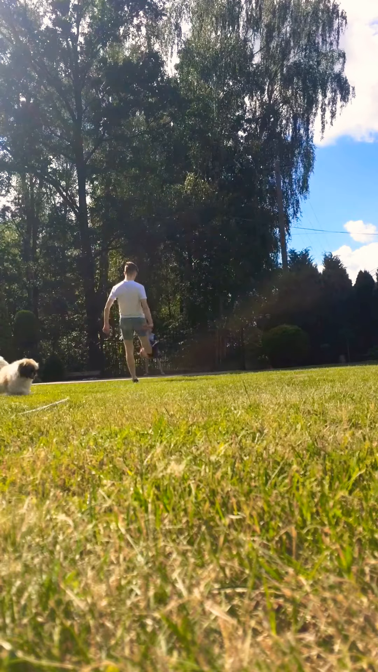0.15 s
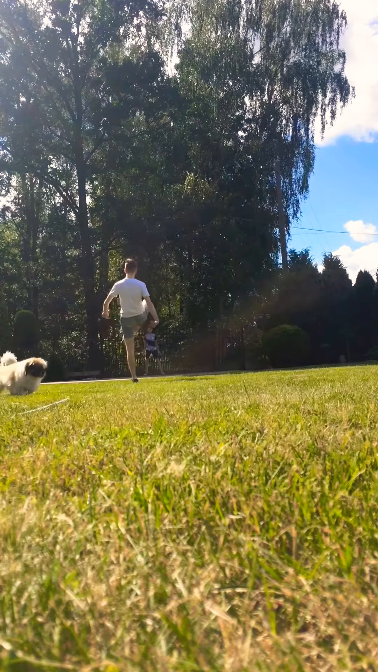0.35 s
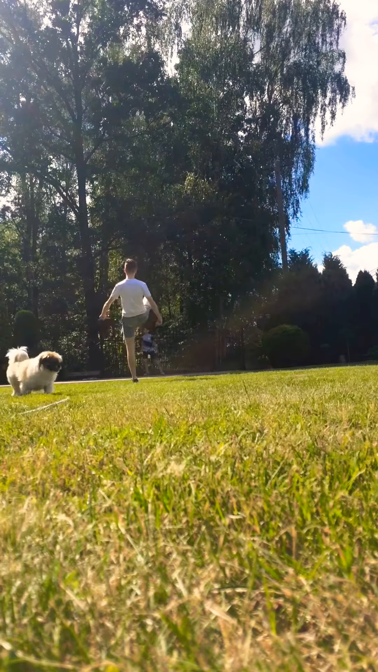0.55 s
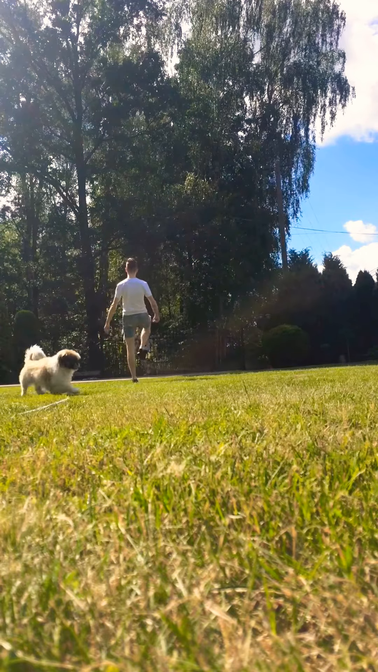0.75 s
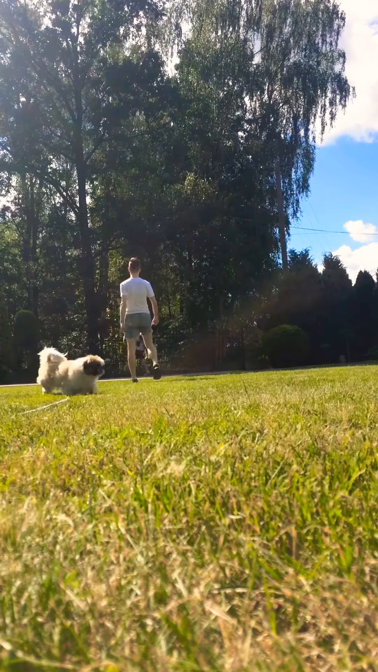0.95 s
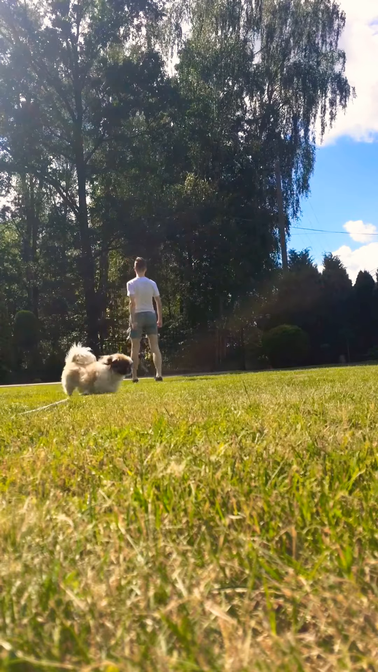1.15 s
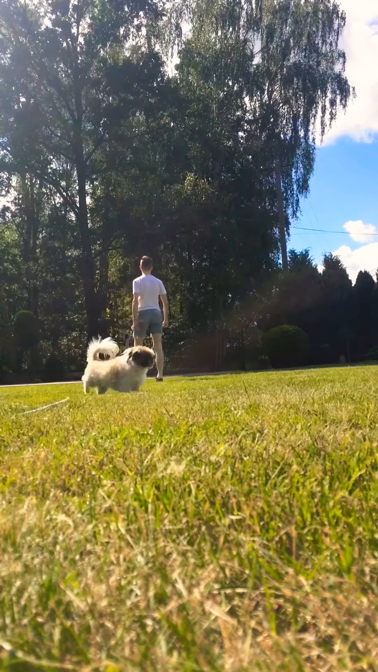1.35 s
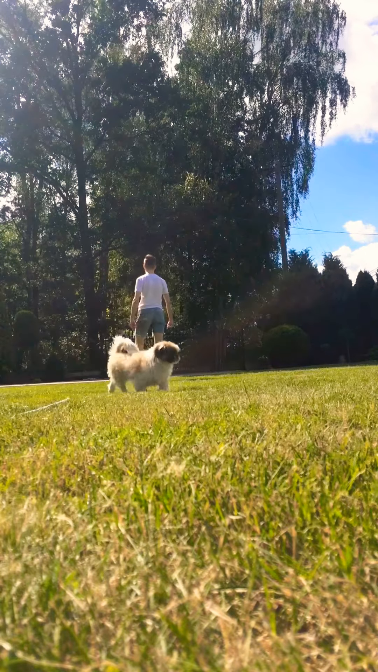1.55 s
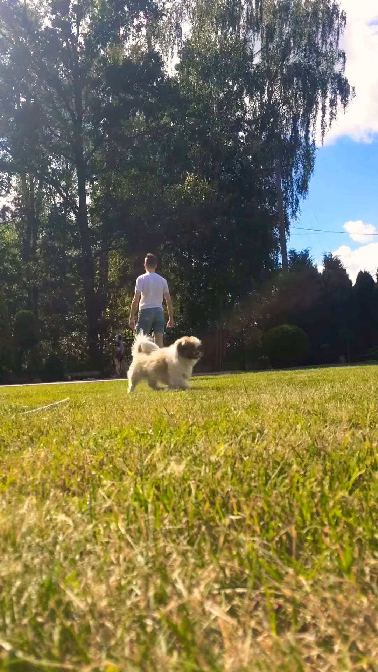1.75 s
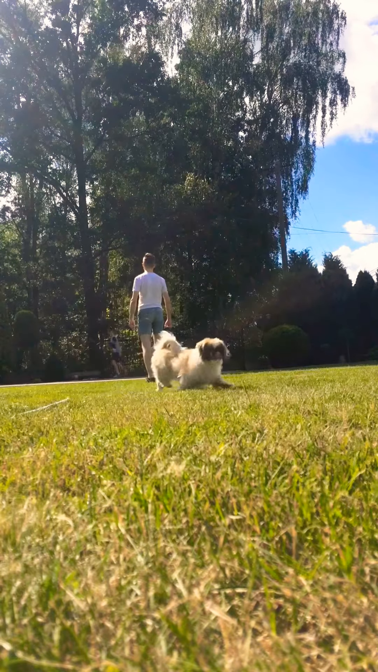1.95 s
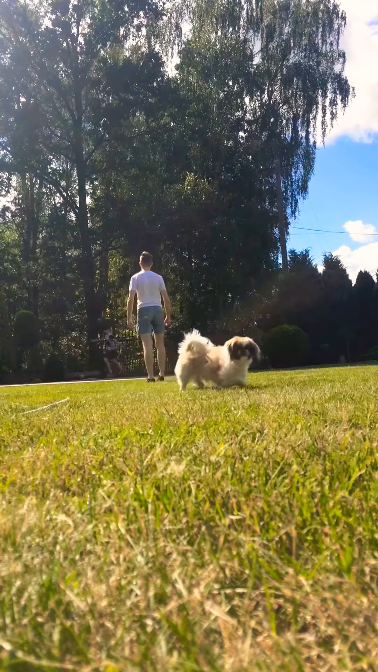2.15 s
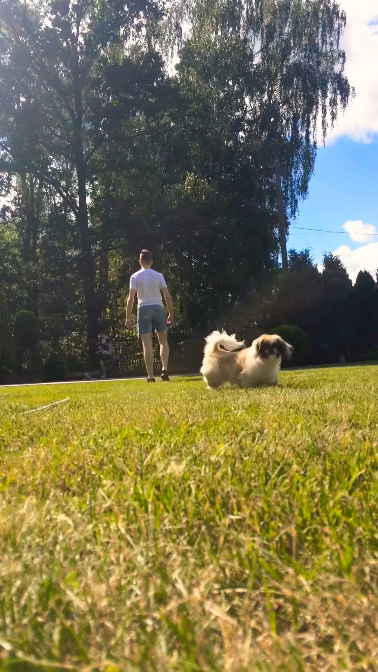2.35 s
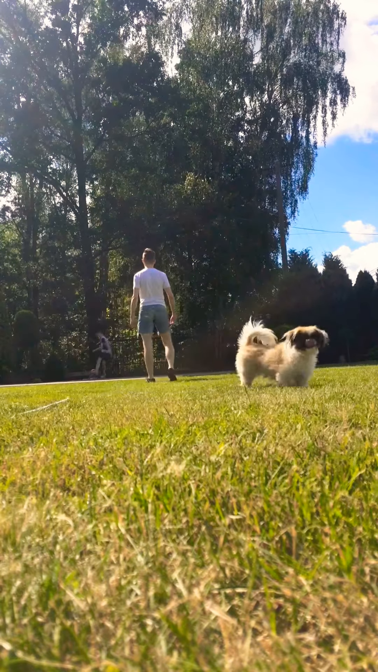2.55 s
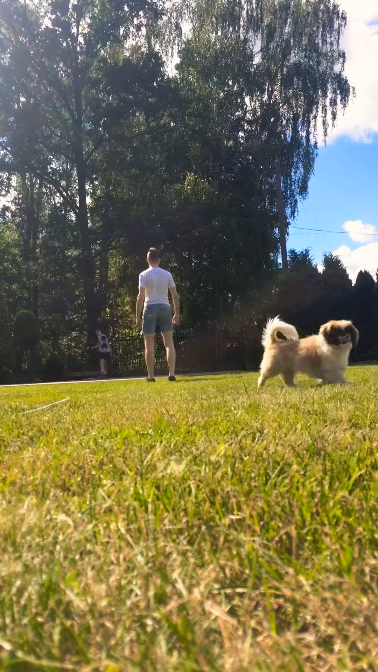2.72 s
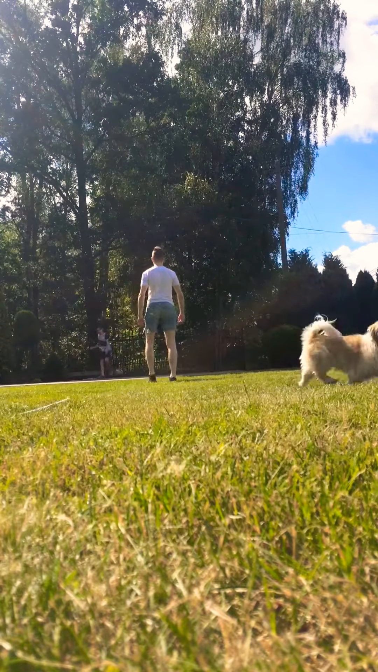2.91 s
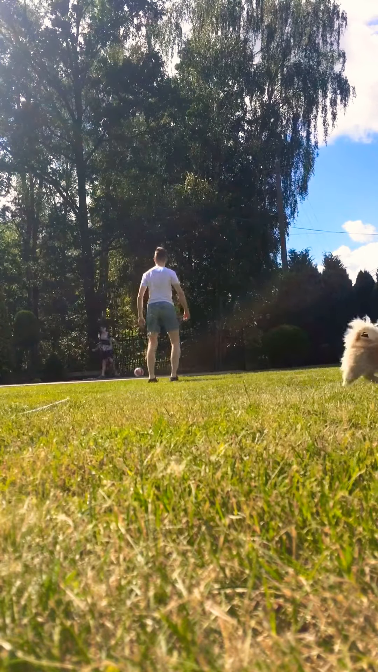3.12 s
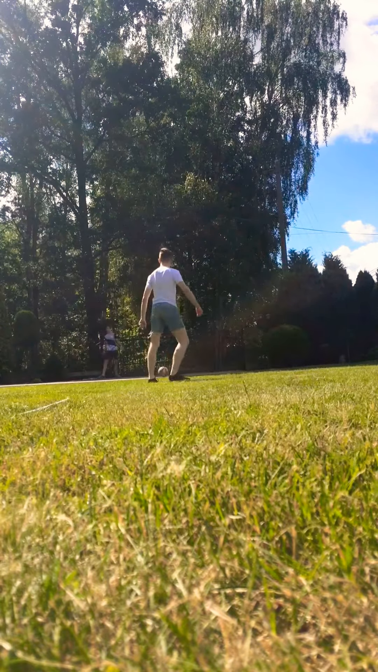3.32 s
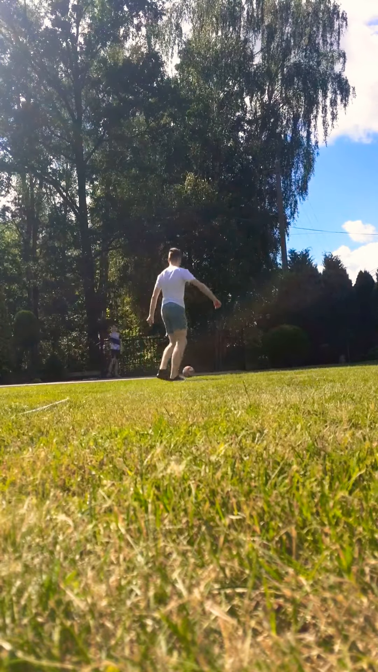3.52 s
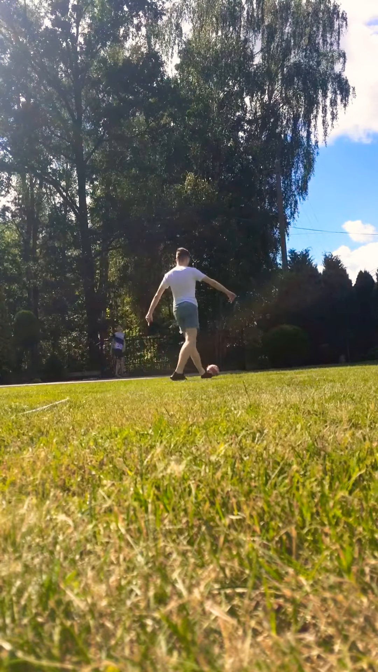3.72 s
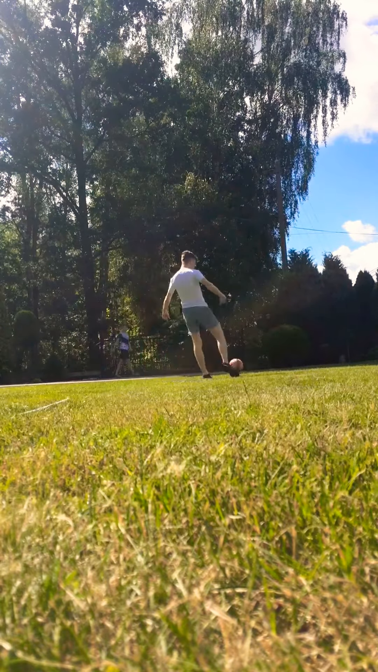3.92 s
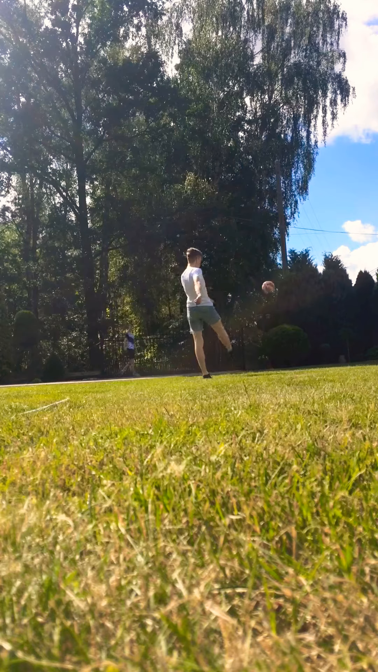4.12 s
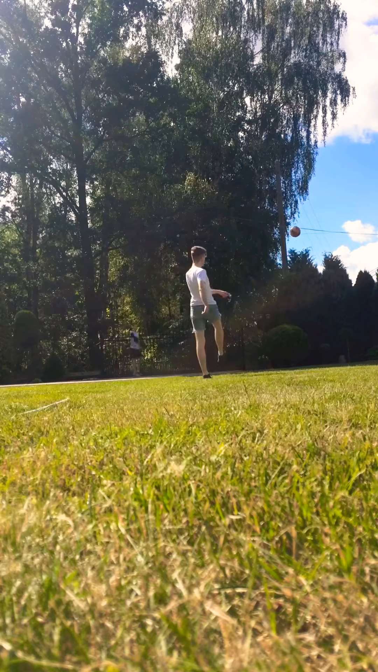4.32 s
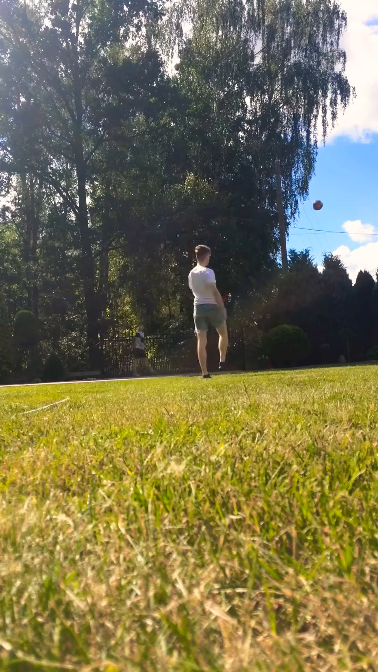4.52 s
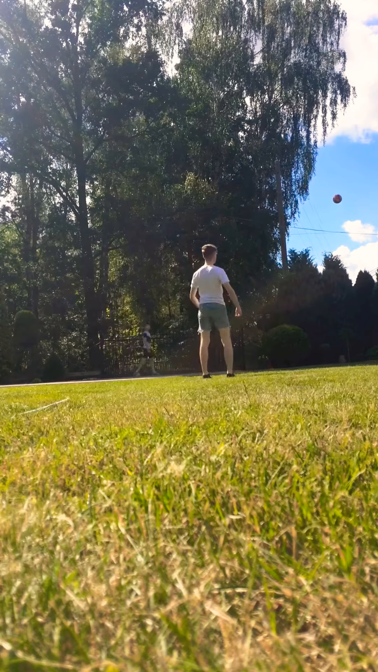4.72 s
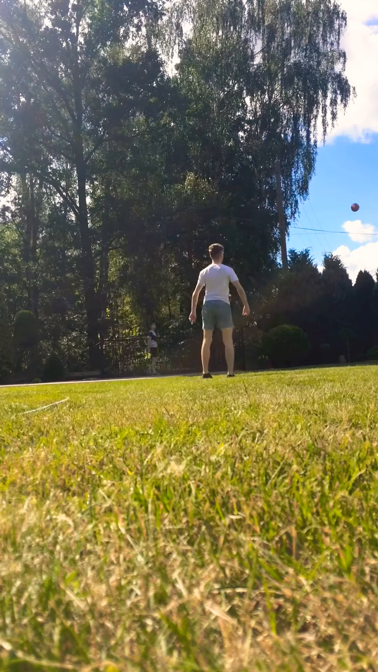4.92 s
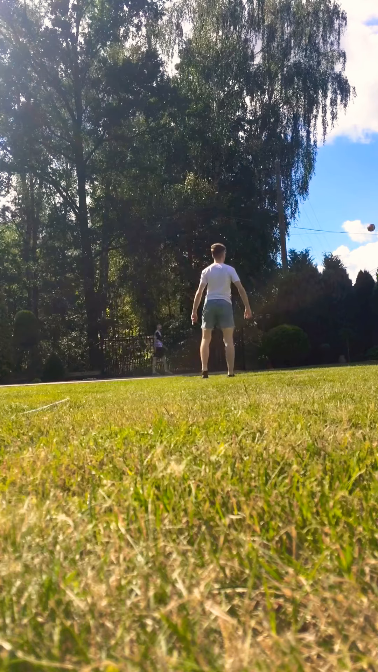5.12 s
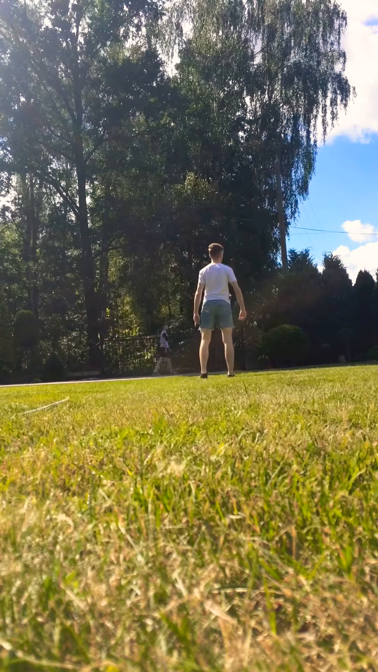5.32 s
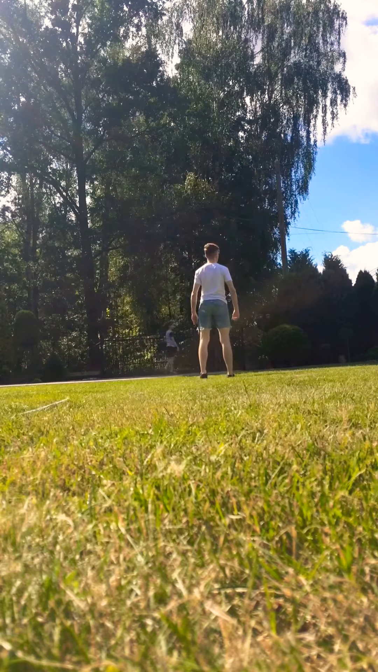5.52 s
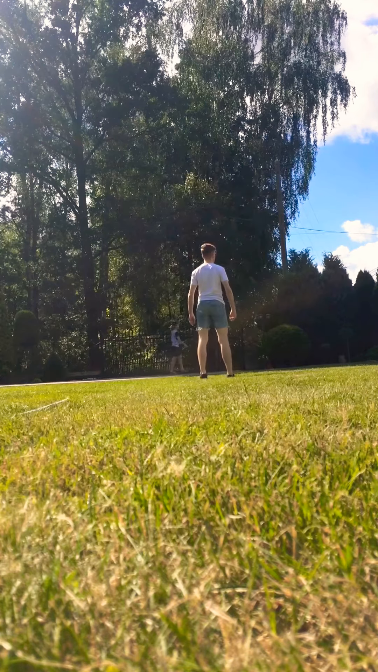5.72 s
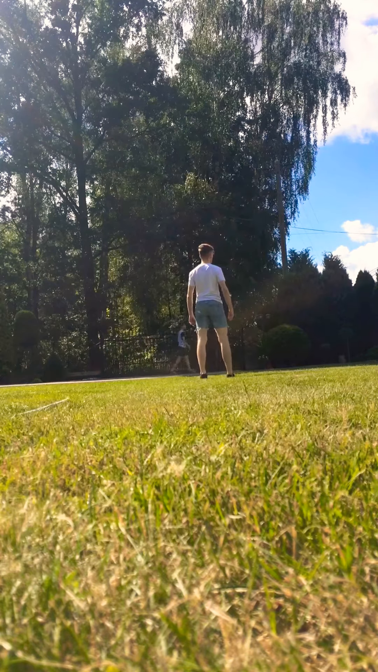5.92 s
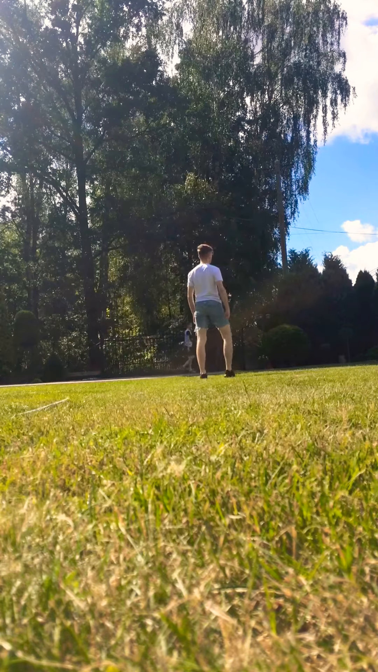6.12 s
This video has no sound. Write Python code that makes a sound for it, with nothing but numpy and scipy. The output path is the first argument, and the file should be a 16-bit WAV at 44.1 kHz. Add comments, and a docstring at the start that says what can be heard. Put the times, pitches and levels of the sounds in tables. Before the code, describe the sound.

Faint rustling leaves, distant traffic and a wavering motor hum form a quiet outdoor background, heard from down in the grass. A little way off, a football gives five deep, hollow thumps, one to two seconds apart, the first and fourth the strongest. A nearby wall and trees add a short dull tail. Soft taps on the turf, low thuds and small ticks fall between the kicks.

```python
"""On a lawn near a wall, microphone lying in the grass, a football kicked about some way off.
Leaves hiss in the breeze, far traffic rumbles and a motor hums throughout. Each contact of the ball
is a low push of air, then a knock of the shell and a crack, on touch and again on letting go;
the wall sends it back, trees and hedges scatter it. Some kicks trail after-thumps or a dull tail.
Soft taps, low thuds, ticks and grass swishes lie between."""
import sys
import numpy as np
from scipy import signal
from scipy.io import wavfile

SR = 44100
rng = np.random.default_rng(int(sys.argv[2]) if len(sys.argv) > 2 else 0)


def generate_wav(sig):
    """Save sig (samples, or channels by samples) to the path in sys.argv[1] as 16-bit PCM at SR."""
    pcm = np.round(np.clip(np.atleast_2d(sig).T, -1, 1) * 32767).astype(np.int16)
    wavfile.write(sys.argv[1], SR, pcm)


N = 271523

# breeze in the leaves: t/s, level under 8 kHz/dB, treble relative to that level/dB
BREEZE_LEVELS = [(0, -61, -2), (.45, -62, -2.5), (.8, -60, -2.5), (1.15, -60, -1.5), (1.75, -59.5, -2.3),
                 (2.1, -62, -2.3), (2.45, -61.5, -0.5), (2.85, -61.5, -1.5), (3.2, -60, -1),
                 (3.7, -62.5, -2), (5.05, -63.5, -0.5), (5.55, -67.5, -5.5), (5.85, -65, -4),
                 (6.16, -66, -4)]
# spectrum of the leaves: f/Hz, relative level/dB
LEAF_SPECTRUM = [(290, -35), (500, -5), (522, -5.5), (1150, -12), (1270, -14), (1470, -5), (3110, 1),
                 (6030, -0.5), (7930, -4.5), (12900, 5), (15600, -29)]
# softer, darker hiss around 2 kHz: t/s, level/dB
DARK_HISS_LEVELS = [(0, -72), (1.6, -73), (3.5, -71), (4.3, -71.5), (5.2, -70), (6.16, -70)]
# spectrum of the far traffic: f/Hz, relative level/dB
TRAFFIC_SPECTRUM = [(20, -51), (40, -2.5), (65, 1.5), (100, -6), (160, -7.5), (250, -15), (400, -19.5),
                    (650, -30.5), (1000, -31)]
# traffic under about 125 Hz: t/s, level/dB
TRAFFIC_DEEP_LEVELS = [(0, -56.5), (1.35, -57), (1.65, -65.5), (2.1, -60.5), (2.7, -56.5), (3.05, -54.5),
                       (3.45, -58.5), (4.1, -59), (6.16, -59.5)]
# traffic above that: t/s, level/dB
TRAFFIC_UPPER_LEVELS = [(0, -59.5), (.6, -63), (2.4, -62), (2.9, -60), (4, -58.5), (4.6, -61.5),
                        (5.7, -63.5), (6.16, -61.5)]
# motor hum: t/s, level/dB
HUM_LEVELS = [(0, -56), (1, -57), (1.5, -68), (2, -62.5), (2.4, -55), (3.05, -55), (3.45, -67.5),
              (4, -61.5), (5.2, -59), (5.75, -61.5), (6.16, -81)]
# the motor's faint tones: f/Hz, level/dB
MOTOR_TONES = [(206, -75.5), (292, -78), (351, -81)]
# kicks and bounces: t/s, push level/dB, push f/Hz, push cycles, touch gain/dB, touch tilt/(dB/octave),
# ring/multiple of t60, knock low-pass f/Hz, crack level/dB, contact length/s, let-go gain/dB,
# let-go tilt/(dB/octave)
CONTACTS = [(0.178, -12.5, 72.3, 1.28, -20.5, 8, .75, 2200, -56, .0175, -26, 0.5),
            (1.2448, -26.5, 136, 1.1, -33, 5, .8, 1200, -51.5, .0214, -38.5, 5),
            (2.598, -19.5, 71, 1.4, -30.5, 3.5, 1.0, 1800, -58, .021, -33.5, 2),
            (4.065, -15.5, 75.5, 2, -14, 2, .7, 1040, -51.5, .0204, -28.5, -5.5),
            (5.9365, -26, 80.6, 1.68, -24.5, 6, .9, 810, -58, 0.01595, -24, 9.5)]
# modes of the ball's shell: f/Hz, relative level/dB, t60/s
SHELL_MODES = [(169.6, 16.5, 0.024), (245, 1, 0.041), (333, 6, 0.032), (427, 4.5, 0.018),
               (592, -2.5, 0.013), (808, -24.5, 0.023), (1390, -4.5, 0.0036)]
# contact by contact: let-go ring/multiple of the touch's ring
LET_GO_RINGS = [1.55, 1.1, 0.92, 0.58, 0.85]
# each contact's echo off the wall: lag/s, push loss/dB, push cycles, knock loss/dB
WALL_ECHOES = [(.050, 9.5, 2.55, 14.5), (.0335, 7.5, 1.3, 5), (0.031, 11, 1.4, 13), (.0545, -2, 1.75, 18.5),
               (.0515, 12, 0.97, 11)]
# soft taps on turf: t/s, level/dB, centre f/Hz, length/s
TURF_TAPS = [(1.219, -48.5, 344, .034), (2.149, -66, 600, 0.015), (2.811, -59, 428, .012),
             (2.911, -53, 410, 0.029), (3.125, -54, 402, 0.037), (3.167, -61.5, 480, 0.036),
             (3.313, -54.5, 400, 0.047), (3.525, -64, 423, 0.069), (3.78, -59, 370, 0.025),
             (5.903, -57, 357, .022), (5.924, -54, 280, .012)]
# low thuds, on their own or late echoes and after-thumps of kicks: t/s, level/dB, f/Hz, cycles
LOW_THUDS = [(1.233, -29.5, 67.6, 2), (2.01, -43.5, 214, 3.6), (2.104, -42, 62.6, 1.9),
             (3.692, -40.5, 66.5, 1.14), (4.1564, -24.5, 106, 0.81), (4.194, -39.5, 90, 3.5),
             (5.737, -40.5, 71, 1.8), (5.804, -41, 78.6, 2), (5.964, -34, 105, 2)]
# high grass swishes, sharp ticks, dull low tails after kicks: t/s, level/dB, low f/Hz, high f/Hz, t60/s
NOISE_BURSTS = [(1.245, -52, 302, 785, 0.13), (1.244, -49, 2200, 13800, 0.28),
                (1.2466, -47, 700, 7000, 0.011), (2.945, -50, 1590, 4800, 0.13),
                (4.12, -40.5, 2750, 3600, 0.018), (5.079, -57, 6000, 14000, .03),
                (5.895, -56.5, 5400, 14000, 0.22), (5.935, -52.5, 4970, 10000, 0.24),
                (5.96, -58, 300, 786, 0.58)]


def from_db(db):
    """Gain of a level in dB."""
    return 10 ** (np.asarray(db) / 20)


def rms_one(x):
    """Scaled to rms 1."""
    return x / np.sqrt(np.mean(x ** 2) + 1e-20)


def in_time(rows):
    """Columns of a curve, one value per sample."""
    times, *columns = np.transpose(rows)
    return [np.interp(np.arange(N) / SR, times, column) for column in columns]


def drift(rate_hz):
    """Slow random wander of rms 1."""
    pole = np.exp(-2 * np.pi * rate_hz * 40 / SR)   # one step every 40 samples
    slow = signal.lfilter([1], [1, -2 * pole, pole * pole], rng.standard_normal(N // 40 + 2002))[2000:]
    return np.interp(np.arange(N) / 40, np.arange(len(slow)), rms_one(slow))


def band(x, low_hz, high_hz):
    """Band-pass."""
    edges_hz = [low_hz, min(high_hz, .45 * SR)]
    return signal.sosfilt(signal.butter(2, edges_hz, "band", fs=SR, output="sos"), x)


def add(out, start_s, piece):
    """Mixes a piece in at a moment."""
    at = round(start_s * SR)
    out[at:at + len(piece)] += piece[:N - at]


def banded_noise(spectrum, below_db, above_db, split_hz, low_hz, count, flicker_db):
    """Flickering half-octave noise bands; those under and over the split follow their own levels."""
    parts, together = np.zeros((2, N)), drift(2.6)
    white = rng.standard_normal((2, N))
    edges = low_hz * 2 ** (np.arange(count + 1) / 2)
    hz, db = np.transpose(spectrum)
    for k, (low, high) in enumerate(zip(edges, edges[1:])):
        centre = np.sqrt(low * high)
        level_db = np.interp(np.log(centre), np.log(hz), db)
        level_db += flicker_db * (together + drift(6.4) + 0.3 * drift(0.27))
        parts[int(centre > split_hz)] += from_db(level_db) * band(white[k % 2], low, high)
    return from_db(below_db) * rms_one(parts[0]) + from_db(above_db) * rms_one(parts[1])


def leaves():
    """Leaves hiss, rising and falling with the breeze."""
    hiss_db, treble_db = in_time(BREEZE_LEVELS)
    return banded_noise(LEAF_SPECTRUM, hiss_db, hiss_db + treble_db,
                        split_hz=7000, low_hz=705.5, count=10, flicker_db=0.5)


def far_traffic():
    """Traffic in the distance: an uneven rumble, mostly bass."""
    deep_db, = in_time(TRAFFIC_DEEP_LEVELS)
    upper_db, = in_time(TRAFFIC_UPPER_LEVELS)
    return banded_noise(TRAFFIC_SPECTRUM, deep_db, upper_db,
                        split_hz=125, low_hz=21.5, count=11, flicker_db=2.1)


def dark_hiss():
    """A softer hiss beneath the leaves; its level flickers quickly."""
    white = rng.standard_normal((2, N))
    level_db = in_time(DARK_HISS_LEVELS)[0] + 0.94 * drift(23)
    return from_db(level_db) * rms_one(band(white[0], 1750, 2610) + 0.67 * band(white[1], 985, 1750))


def motor(hum_hz=125):
    """A motor hums: one wavering tone and a few faint, steadier ones."""
    hum_db, = in_time(HUM_LEVELS)
    out = from_db(hum_db + 2.4 * drift(9)) * np.sin(2 * np.pi * np.cumsum(hum_hz + 2.2 * drift(8)) / SR)
    for hz, db in MOTOR_TONES:
        out += from_db(db + 2.5 * drift(2.5)) * np.sin(2 * np.pi * np.cumsum(hz + 1.2 * drift(3)) / SR)
    return np.sqrt(2) * out


def knock(gain_db, tilt, ring, top_hz, crack_db, spread_db):
    """The ball's shell modes, set off inwards by a soft contact, and a short crack."""
    t = np.arange(SR // 8) / SR
    mode_hz, mode_db, mode_t60 = np.transpose(SHELL_MODES)[:, :, None]
    # a harder contact favours the upper modes; a foot or turf that stays in touch shortens the ring
    start_db = mode_db + spread_db + tilt * np.log2(mode_hz / 340)
    modes = from_db(start_db - 60 * t / (mode_t60 * ring)) * np.sin(2 * np.pi * mode_hz * t)
    onset = np.sin(np.pi / 2 * np.minimum(t / 0.003, 1)) ** 2
    shell = -from_db(gain_db) * modes.sum(axis=0) * onset
    shell = signal.sosfilt(signal.butter(4, top_hz, fs=SR, output="sos"), shell)
    crack = rms_one(band(rng.standard_normal(len(t)), 1000, 6000)) * from_db(-60 * t / 0.093)
    return shell + from_db(crack_db) * crack


def push(hz, cycles):
    """A few swings of air that swell and die as the ball squashes and springs back; no net flow."""
    samples = cycles / hz * SR
    progress = np.arange(round(samples)) / samples
    swell = np.sin(np.pi * progress ** .85) ** 1.2
    swing = np.sin(2 * np.pi * cycles * progress)
    return swell * (swing - np.sum(swell * swing) / np.sum(swell))


def football(squash_lag_s=.0025):
    """Touch, push and let-go of each contact, reaching the microphone straight and off the wall."""
    out = np.zeros(N)
    spreads_db = rng.normal(0, 1.2, (len(CONTACTS), 2, len(SHELL_MODES), 1))
    for contact, echo, let_go_ring, spread_db in zip(CONTACTS, WALL_ECHOES, LET_GO_RINGS, spreads_db):
        (start_s, push_db, hz, cycles, touch_db, touch_tilt,
         ring, top_hz, crack_db, contact_s, let_go_db, let_go_tilt) = contact
        lag_s, push_loss_db, echo_cycles, knock_loss_db = echo
        add(out, start_s + squash_lag_s, from_db(push_db) * push(hz, cycles))
        add(out, start_s + lag_s, from_db(push_db - push_loss_db) * push(hz, echo_cycles))
        straight = (start_s, 0, 0, crack_db)
        off_wall = (start_s + lag_s, knock_loss_db, 1, crack_db - 2)
        for arrival_s, loss_db, extra_tilt, path_crack_db in (straight, off_wall):
            touch = knock(touch_db - loss_db, touch_tilt + extra_tilt, ring,
                          top_hz, path_crack_db, spread_db[0])
            # letting go is softer: a lower top and a weaker crack
            let_go = knock(let_go_db - loss_db, let_go_tilt + extra_tilt, let_go_ring * ring,
                           0.69 * top_hz, path_crack_db - 10, spread_db[1])
            add(out, arrival_s, touch)
            add(out, arrival_s + contact_s, let_go)
    return out


def lawn_scatter(sound, gain_db=-33.5, t60_s=0.4, rise_s=.035):
    """Trees and hedges around the lawn scatter a sound into a dull, dying tail."""
    t = np.arange(SR // 2) / SR
    envelope = from_db(-60 * t / t60_s) * np.minimum(t / rise_s, 1) ** 2
    tail = band(rng.standard_normal(len(t)), 122, 540) * envelope
    return from_db(gain_db) * signal.fftconvolve(sound, tail / np.sqrt(np.sum(tail ** 2)))[:N]


def taps():
    """Soft puffs of noise, as of paws or soles on turf."""
    out = np.zeros(N)
    for start_s, db, hz, length_s in TURF_TAPS:
        progress = np.arange(round(length_s * SR)) / (length_s * SR)
        noise = band(rng.standard_normal(4000), hz / 2.1, hz * 1.9)
        puff = rms_one(band(noise, hz / 2.1, hz * 2.1))[-len(progress):]
        add(out, start_s, from_db(db) * puff * np.sin(np.pi * np.sqrt(progress)))
    return out


def thuds():
    """Low pushes of air: some on their own, some late echoes and after-thumps of the kicks."""
    out = np.zeros(N)
    for start_s, db, hz, cycles in LOW_THUDS:
        add(out, start_s, from_db(db) * push(hz, cycles))
    return out


def noise_bursts():
    """Dying bursts of noise: high grass swishes, sharp ticks and dull low tails after kicks."""
    out = np.zeros(N)
    t = np.arange(SR // 4) / SR
    for start_s, db, low_hz, high_hz, t60_s in NOISE_BURSTS:
        envelope = from_db(db - 60 * t / t60_s) * np.minimum(25 * t / t60_s, 1)
        noise = band(rng.standard_normal(2 * len(t)), low_hz, high_hz)[len(t):]
        add(out, start_s, envelope * rms_one(noise))
    return out


def scene():
    """Everything that reaches the one microphone in the grass."""
    ambience = leaves() + far_traffic() + dark_hiss()
    ball = football()
    return (ambience + ball + lawn_scatter(ball) + taps() + thuds() + noise_bursts() + motor())[None]


def record(dry, low_hz=44, top_hz=15850):
    """The small microphone loses the deepest bass; the top is cut steeply."""
    thin = signal.sosfilt(signal.butter(2, low_hz, "high", fs=SR, output="sos"), dry)
    return signal.sosfilt(signal.ellip(16, .1, 70, top_hz, fs=SR, output="sos"), thin)


dry = scene()
out = record(dry)
generate_wav(out)
```